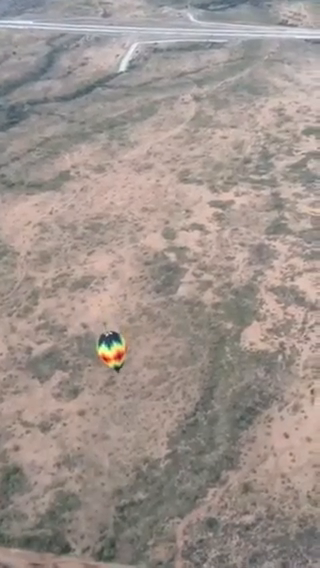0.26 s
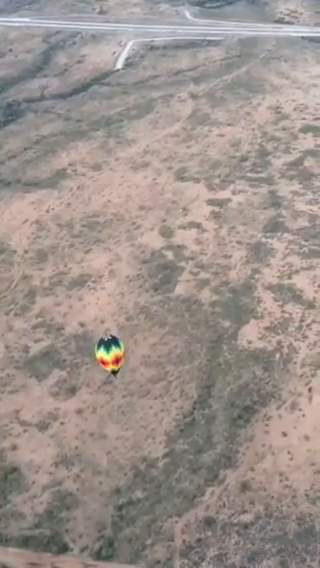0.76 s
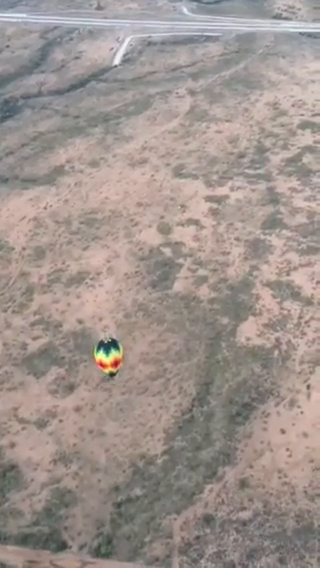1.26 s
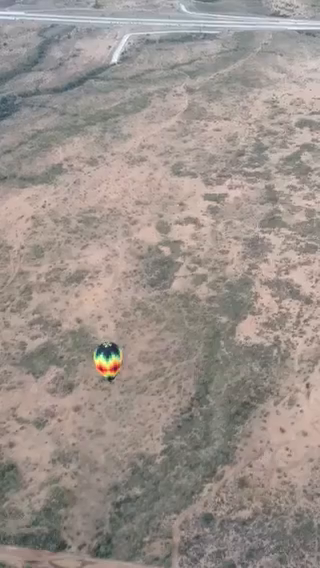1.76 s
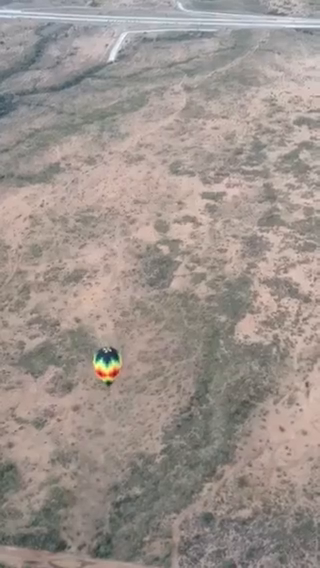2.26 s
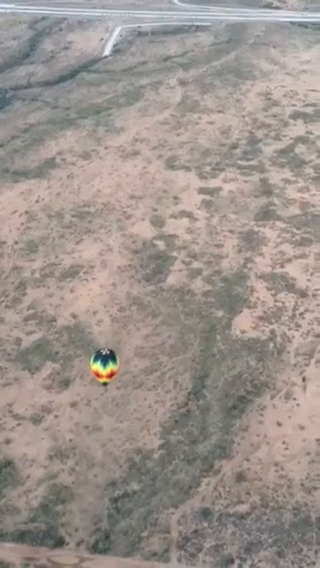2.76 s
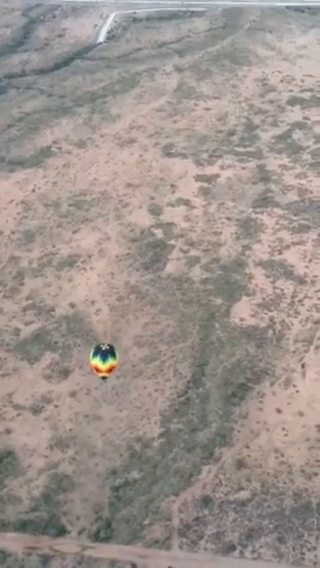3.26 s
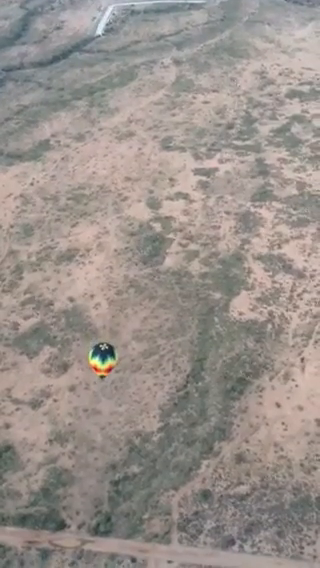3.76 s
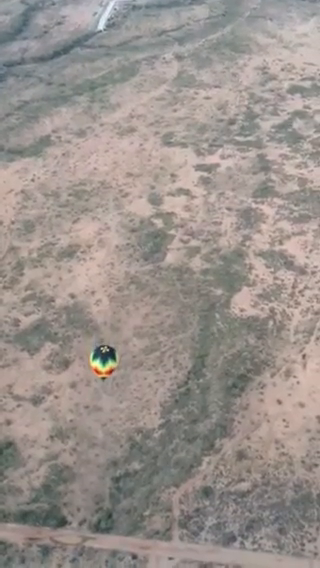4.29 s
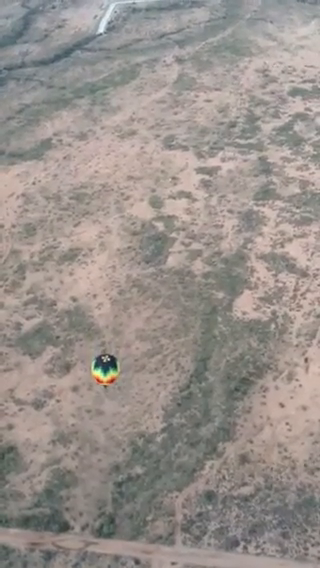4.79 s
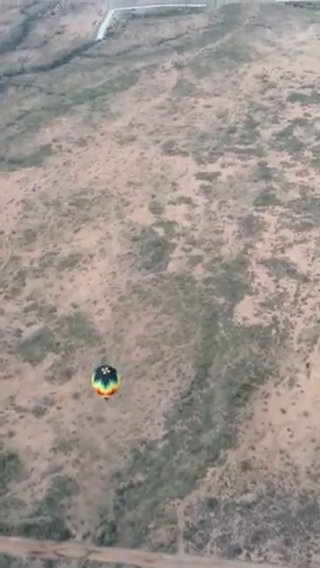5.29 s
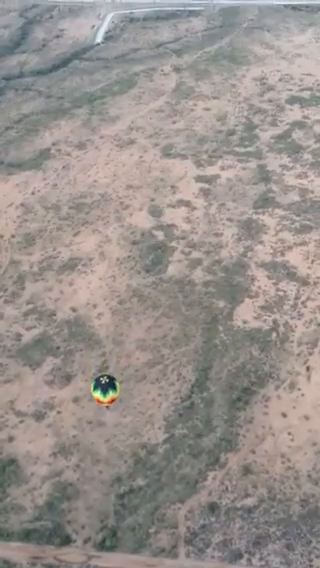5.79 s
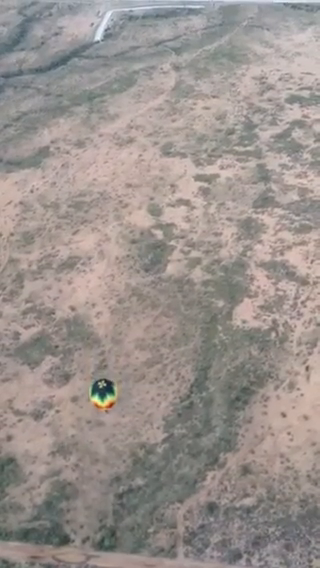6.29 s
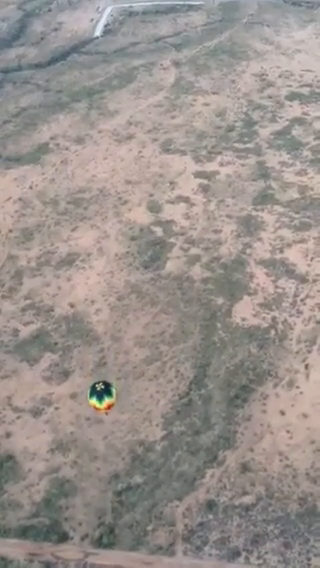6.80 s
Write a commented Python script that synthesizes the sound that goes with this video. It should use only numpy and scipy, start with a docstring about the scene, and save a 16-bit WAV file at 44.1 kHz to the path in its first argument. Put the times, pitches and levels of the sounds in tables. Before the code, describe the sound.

Close, loud capture beneath a propane burner in the open air. Quiet rumble and fizz first, light fitting ticks, a sleeve rustle; then one abrupt blast of deep flame roar, raspy midrange and bright gas hiss, punctuated by short low booms. The valve shuts, the flame dies in a fraction of a second with a dull fabric echo, and faint sizzle remains with a distant engine hum.

```python
"""In the basket of a hot air balloon, the propane burner overhead fires once, for three seconds.
The jet is hissing noise; the flame is roaring and rasping noise, with short booms as pockets of gas ignite.
When the valve shuts, the hose empties and the flame dies away; the fabric returns a dull noise echo.
Around the blast: the rumbling land and sizzling pilot light in shaped noise, noise bursts for ticks and
a sleeve, and an engine gathering speed far below, built from sine lines."""
import sys
import numpy as np
from scipy import signal
from scipy.fft import rfft, irfft
from scipy.io import wavfile
from scipy.ndimage import uniform_filter1d

SR = 44100
rng = np.random.default_rng(int(sys.argv[2]) if len(sys.argv) > 2 else 0)


def generate_wav(sig):
    """Save sig (samples, or channels by samples) to the path in sys.argv[1] as 16-bit PCM at SR."""
    pcm = np.round(np.clip(np.atleast_2d(sig).T, -1, 1) * 32767).astype(np.int16)
    wavfile.write(sys.argv[1], SR, pcm)


N = 310766
TIME, BINS = np.arange(N) / SR, np.fft.rfftfreq(N, 1 / SR)  # seconds, Hz

# Spectrum of the land's rumble: [hz, relative_db_per_hz]
LAND_SPECTRUM = [(20, -50), (45, -39.5), (80, -17.5), (120, -8), (170, -0.5), (225, -1.5), (310, -5.5),
                 (410, -13.5), (520, -12), (680, -12), (950, -20), (1300, -30.5), (2500, -36), (6000, -46)]
# Spectrum of the pilot light's fizz: [hz, relative_db_per_hz]
PILOT_SPECTRUM = [(500, -21), (1500, -20.5), (2500, -11.5), (2900, -13), (4600, -10), (6000, -16),
                  (9000, -17.5), (15000, -23)]
# Resonances of the pilot light's tube: [centre_hz, width_hz, relative_db]
PILOT_MODES = [(1867, 130, 4), (2200, 150, -4), (3407, 125, 5), (3910, 390, 3), (5370, 300, -9),
               (7600, 750, -10), (9510, 350, -15.5), (11600, 800, -14.5)]
# Path of an engine on the road: [time_s, firing_rate_hz, level_db]
ENGINE_PATH = [(0, 55.3, -72), (.55, 57.05, -59), (2.0, 68, -59.5), (2.4, 68.8, -58.5), (5.8, 74.2, -50.5),
               (6.4, 74.3, -52.5), (7.05, 74.2, -55)]
# Lines of the exhaust note: [multiple_of_firing_rate, relative_db]
ENGINE_ORDERS = [(2, -11.5), (3, -17.5), (4, 0.5), (6, -9), (7, -19), (8, -12.5), (10, -18)]
# Bands where the engine's lines swell as they climb through: [centre_hz, width_hz, boost_db]
ENGINE_BANDS = [(450, 25, 3.5), (548, 28, 10.5), (686, 28, 10)]
# Small ticks and a knock in the basket: [start_s, level_db, t60_s, centre_hz, width_octaves]
TICKS = [(.179, -53, .06, 6000, 1.2), (0.329, -55, .12, 1900, 0.17), (.556, -56, 0.4, 1220, 0.37),
         (1.139, -55, .05, 5000, 1.2), (1.198, -43.5, 0.051, 5200, 1.1), (5.84, -48, 0.13, 8500, 1.0),
         (6.799, -57, 0.044, 4520, 1.0)]
# Resonances of the ringing metal: [centre_hz, width_hz, relative_db]
METAL_MODES = [(1280, 400, 1), (2550, 120, -2), (3290, 110, 1), (3800, 220, 3), (4600, 250, -1),
               (9600, 200, 0)]
# Sleeve stroke as an arm reaches for the valve: [time_s, level_db]
SLEEVE_LEVEL = [(2.06, -72), (2.11, -60), (2.16, -59.5), (2.231, -58), (2.3, -74)]
# Spectrum of the sleeve's cloth: [hz, relative_db_per_hz]
CLOTH_SPECTRUM = [(50, -35), (200, -13.5), (900, 3), (1600, -3), (2800, -5), (4200, 0.5), (6000, -7.5),
                  (7500, -7.5), (10000, -14), (15000, -15.5)]
# Sudden flare-ups, the first one the ignition: [start_s, level_db, middle_of_pitch_glide_hz, decay_s]
FLARES = [(2.6143, -0.5, 219, 0.0033), (2.771, -2.5, 178, 0.0062), (2.895, -10.5, 169, 0.0077),
          (3.215, -3, 204, 0.005), (3.361, -7, 210, .006), (3.749, -6, 183, 0.0057),
          (4.103, -6, 230.4, 0.0044), (4.434, -10, 162, 0.0058)]
# Moments when flame and hiss briefly dip or swell: [centre_s, spread_s, flame_change_db, hiss_change_db]
FLOW_CHANGES = [(2.647, .018, -3, 5), (2.8, .04, -1, -1.5), (3.249, 0.039, -3, -2.5), (3.645, .04, 0.5, -1),
                (4.015, .025, -1.5, -3), (4.505, .03, -1.5, -2)]
# Gas leaving the nozzles, eased off in two steps: [time_s, relative_hiss_db]
JET_LEVEL = [(2.68, -15.8), (3.14, -14.5), (3.7, -15.5), (3.9, -14), (4.74, -13.5), (4.76, -15.5),
             (5.1, -15.5), (5.28, -17), (5.31, -20), (5.57, -24)]
# Spectrum of the jet's hiss: [hz, relative_db_per_hz]
HISS_SPECTRUM = [(400, -31), (1600, -12.5), (2400, -6.5), (3200, -9.5), (3750, -5), (4350, -3), (5100, -5),
                 (5650, -11), (6400, -5), (6900, -5.5), (7700, -1.5), (10000, -2.5), (11400, -1.5),
                 (15300, -5)]
# Strength of the burning gas: [time_s, relative_roar_db]
FLAME_LEVEL = [(2.7, -16), (3.03, -14), (3.19, -15.5), (4.72, -17), (5.12, -13), (5.68, -20)]
# Spectrum of the flame's roar: [hz, relative_db_per_hz]
ROAR_SPECTRUM = [(20, -47), (50, -49.5), (80, -25.5), (115, -14.5), (160, -2), (235, -0.5), (320, -5),
                 (410, -10.5), (470, -12.5), (600, -12.5), (680, -20.5), (1100, -43), (3000, -73.5)]
# Spectrum of the flame's upper rasp: [hz, relative_db_per_hz]
RASP_SPECTRUM = [(300, -32), (560, -2), (720, -1.5), (900, 1), (1050, -2.5), (1280, 2), (1450, -2.5),
                 (1600, -7), (1750, -8.5), (2400, -14.5), (4000, -13), (15000, -29)]

# The blast: valve cracks open, gas lights, valve shuts, flame runs out of gas (s)
OPEN_S, IGNITE_S, SHUT_S, STARVE_S = 2.591, 2.604, 5.555, 5.705
# As the hose empties, hiss and rasp fall 60 dB ever faster (s); bend of that fall
HISS_DRAIN_S, RASP_DRAIN_S, DRAIN_BEND = 0.26, 0.31, 2.24


def gain_of(db):
    """Turns decibels into gain."""
    return 10 ** (np.asarray(db) / 20)


def evened(x):
    """Scales a sound to rms 1."""
    return x / np.sqrt(np.mean(x ** 2) + 1e-20)


def colour(points):
    """Draws the gain at every frequency through (Hz, dB) points, on a log frequency scale."""
    hz, db = np.transpose(points)
    return gain_of(np.interp(np.log(BINS + 1), np.log(hz + 1), db))


def noise(gain):
    """Makes noise of rms 1 with the given spectrum."""
    return evened(irfft(rfft(rng.standard_normal(N)) * gain, N))


def eddies(rate_hz):
    """Random unsteadiness of rms 1, up to about the given rate."""
    return noise(BINS / (BINS + 6) / (1 + (BINS / rate_hz) ** 2))


def resonances(modes, stretch=1):
    """Sums the power of resonances at every frequency; stretch scales their pitch."""
    power = 0
    for centre_hz, width_hz, db in modes:
        distance = (BINS - centre_hz * stretch) / (0.7 * width_hz)
        power = power + gain_of(db) ** 2 / (1 + distance ** 2) ** 2
    return power


def ramp(start_s, seconds):
    """Goes from 0 to 1 over the given time."""
    return np.clip((TIME - start_s) / seconds, 0, 1)


def release(start_s, t60_s, bend=1):
    """Holds at 1 until start, then falls 60 dB in t60; a bend over 1 makes it fall ever faster."""
    return gain_of(-60 * (np.maximum(TIME - start_s, 0) / t60_s) ** bend)


def steadied(x, seconds):
    """Evens out the slow swells of a noise and keeps its fast flutter."""
    power = abs(uniform_filter1d(x ** 2, max(int(seconds * SR), 2)))
    return x / np.sqrt(power + 1e-9)


def add(mix, start_s, sound):
    """Mixes a sound in at its start time."""
    part = mix[max(round(start_s * SR), 0):][:len(sound)]
    part += sound[:len(part)]


def land(level_db=-51.5):
    """The land below is a steady rumble: noise weighted towards the lows."""
    return noise(colour(LAND_SPECTRUM)) * gain_of(level_db)


def pilot_light(level_db=-60.5, flicker_db=1.1, cool_stretch=0.91, unsettled_db=-1.3):
    """The pilot light sizzles through its tube, whose resonances colour the fizz."""
    settle_s, settling_s, unsettled_share = 6.52, 0.06, 0.82
    fizz = colour(PILOT_SPECTRUM) ** 2
    hot = noise(np.sqrt(fizz + resonances(PILOT_MODES)))
    # unsettled by the blast, the pilot burns cooler: its upper resonances sag and weaken
    sagged = resonances(PILOT_MODES[:1]) + resonances(PILOT_MODES[1:], cool_stretch) / 4
    cool = noise(np.sqrt(fizz + sagged)) * gain_of(unsettled_db)
    # the cool sound enters as the valve shuts and has faded out by settle_s
    share = unsettled_share * (TIME > SHUT_S) * (1 - ramp(settle_s - settling_s, settling_s))
    pilot = np.sqrt(1 - share) * hot + np.sqrt(share) * cool
    return pilot * gain_of(level_db + flicker_db * eddies(60))


def engine(waver_db=0.2, drift=0.0015):
    """A far exhaust note on multiples of the firing rate; moving air makes each line waver."""
    time_s, firing_hz, level_db = np.transpose(ENGINE_PATH)
    rate = np.interp(TIME, time_s, firing_hz)
    turns = np.cumsum(rate * (1 + drift * eddies(2.4))) / SR
    lines = np.zeros(N)
    for multiple, line_db in ENGINE_ORDERS:
        swell_db = 0
        for centre_hz, width_hz, boost_db in ENGINE_BANDS:
            swell_db = swell_db + boost_db * np.exp(-((multiple * rate - centre_hz) / width_hz) ** 2)
        line = np.sin(2 * np.pi * (multiple * turns + rng.random()))
        lines += line * gain_of(line_db + swell_db + waver_db * eddies(3))
    return evened(lines) * gain_of(np.interp(TIME, time_s, level_db))


def ticks(rise_s=0.0008, dry_share=0.12, ring_db=-13, ring_t60_s=0.15):
    """Each tick is a brief burst, coloured by metal resonances, which ring on faintly."""
    out, t = np.zeros(N), np.arange(SR // 3) / SR
    modes = resonances(METAL_MODES)
    for start_s, level_db, t60_s, centre_hz, octaves in TICKS:
        band = np.exp(-(np.log2((BINS + 1) / centre_hz) / octaves) ** 2 / 2)
        burst = noise(np.sqrt(dry_share + modes) * band)[:len(t)] * gain_of(-60 * t / t60_s)
        ring = noise(modes * band)[:len(t)] * gain_of(ring_db - 60 * t / ring_t60_s)
        attack = 1 - np.exp(-t / rise_s)
        add(out, start_s, (burst + ring) * gain_of(level_db) * attack)
    return out


def sleeve(grain_db=2):
    """Cloth slides over cloth in one short, grainy stroke."""
    time_s, level_db = np.transpose(SLEEVE_LEVEL)
    # practically silent outside the stroke
    stroke = gain_of(np.interp(TIME, time_s, level_db, left=-120, right=-120))
    return noise(colour(CLOTH_SPECTRUM)) * gain_of(grain_db * eddies(150)) * stroke


def fabric_echo(x, delay_s=0.038, t60_s=0.38, wet_db=-20, dull_hz=1800):
    """The fabric overhead scatters a short, dull echo back into the basket."""
    t = np.arange(SR // 2) / SR
    taps = rng.standard_normal(len(t)) * gain_of(-60 * t / t60_s) * (t > delay_s)
    echo = signal.fftconvolve(x, taps / np.linalg.norm(taps))[:N]
    dulled = irfft(rfft(echo) / (1 + (BINS / dull_hz) ** 2), N)
    return gain_of(wet_db) * dulled


def flares(push=0.038, sag=0.096):
    """A pocket of gas burns at once: a push of air and a few sinking cycles of boom."""
    out, t = np.zeros(N), np.arange(SR // 10) / SR
    for start_s, level_db, middle_hz, decay_s in FLARES:
        swell = t / decay_s * np.exp(1 - t / decay_s)
        pitch_hz = middle_hz * (1 + sag * np.exp(-t / decay_s) - sag / 2)
        boom = np.sin(2 * np.pi * np.cumsum(pitch_hz) / SR)
        add(out, start_s, gain_of(level_db) * swell * (boom + push))
    return out


def flow_changes():
    """Gains of flame and hiss as they briefly dip or swell, then return."""
    flame_db, hiss_db = np.zeros(N), np.zeros(N)
    for centre_s, spread_s, flame_change_db, hiss_change_db in FLOW_CHANGES:
        moment = np.exp(-((TIME - centre_s) / spread_s) ** 2)
        flame_db += flame_change_db * moment
        hiss_db += hiss_change_db * moment
    return gain_of(flame_db), gain_of(hiss_db)


def gas_hiss(valve, hiss_change, flutter, flutter_db=0.68, dulling=0.154, full_db=-16, top_hz=6000):
    """Gas rushing from the nozzles hisses; its level follows the pressure in the hose."""
    gain_db, cracked_db, travel_s = 1, -19.5, 0.085  # cracked open, below full flow; lever travel
    flow_db = gain_db + np.interp(TIME, *np.transpose(JET_LEVEL))
    flow_db += cracked_db * (1 - ramp(OPEN_S, travel_s))
    pressure = valve * gain_of(flow_db) * hiss_change * release(SHUT_S, HISS_DRAIN_S, DRAIN_BEND)
    jet = noise(colour(HISS_SPECTRUM))
    low = irfft(rfft(jet) / (1 + (BINS / top_hz) ** 4), N)
    # as the pressure falls, the top of the hiss fades first
    top = (jet - low) * (pressure / gain_of(full_db)) ** dulling
    return (low + top) * pressure * gain_of(flutter_db * flutter)


def flame_roar(flame, flutter, surge, gain_db=5, flutter_db=0.3, surge_db=0.82, t60_s=0.14):
    """The turbulent flame roars low, surging until it runs out of gas."""
    roar = steadied(noise(colour(ROAR_SPECTRUM)) * gain_of(flutter_db * flutter), 0.07)
    level_db = gain_db + np.interp(TIME, *np.transpose(FLAME_LEVEL)) + surge_db * surge
    return roar * flame * gain_of(level_db) * release(STARVE_S, t60_s)


def flame_rasp(flame, flutter, surge, gain_db=-21, flutter_db=0.74, surge_db=0.66):
    """The flame's upper rasp is harder while fresh and dies as the hose empties."""
    fresh_db, fresh_s = 4, 0.087  # extra rasp, and how long after lighting it is greatest
    age = np.maximum(TIME - IGNITE_S, 0) / fresh_s
    rasp = evened(noise(colour(RASP_SPECTRUM)) * gain_of(flutter_db * flutter + surge_db * surge))
    level_db = gain_db + fresh_db * age * np.exp(1 - age)
    return rasp * flame * gain_of(level_db) * release(SHUT_S, RASP_DRAIN_S, DRAIN_BEND)


def burner(flutter_hz=45, surge_hz=14, unlit_db=-24, catch_s=0.0015):
    """A jet feeds a flame; shared eddies flutter roar, rasp and hiss, and surge roar and rasp."""
    flame_change, hiss_change = flow_changes()
    flutter, surge = eddies(flutter_hz), eddies(surge_hz)
    valve = ramp(OPEN_S, 0.003)
    # before it lights, the rush of gas is far below the flame
    flame = valve * gain_of(unlit_db * (1 - ramp(IGNITE_S, catch_s))) * flame_change
    hiss = gas_hiss(valve, hiss_change, flutter)
    return hiss + flame_roar(flame, flutter, surge) + flame_rasp(flame, flutter, surge)


def scene():
    """Sums everything heard in the basket, the same in both channels."""
    background = land() + pilot_light() + engine() + ticks() + sleeve()
    blast = flares() + burner()
    mono = background + blast + fabric_echo(blast)
    return np.array([mono, mono])


def gain_control(x, threshold_db=-44, squeeze=0.14, recovery_db_per_s=19, attack_s=0.03):
    """Turns loud sound down quickly and comes back slowly, hushing the background after the blast."""
    keep = np.exp(-1 / (attack_s * SR))
    power = signal.lfilter([1 - keep], [1, -keep], (x ** 2).mean(0))
    power_db = 10 * np.log10(power + 1e-12)
    # hold the peaks, letting the held level fall at the recovery rate
    fall_db = TIME * recovery_db_per_s
    held_db = np.maximum.accumulate(power_db + fall_db) - fall_db
    over_db = np.maximum(held_db - threshold_db, 0)
    return x * gain_of(-squeeze * over_db)


def record(dry, ceiling=1.0, edge_hz=15300):
    """Applies gain control, rounds off the loudest peaks, then cuts everything above the band edge."""
    ducked = gain_control(dry)
    rounded = ducked / (1 + (ducked / ceiling) ** 6) ** (1 / 6)
    lowpass = signal.firwin(1023, edge_hz, window=("kaiser", 9), fs=SR)
    return signal.oaconvolve(rounded, lowpass[None], "same")


dry = scene()
out = record(dry)
generate_wav(out)
```